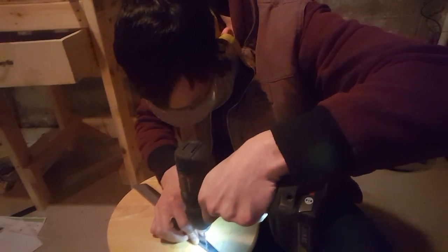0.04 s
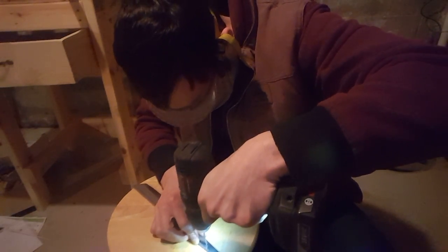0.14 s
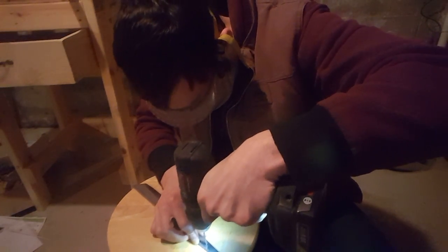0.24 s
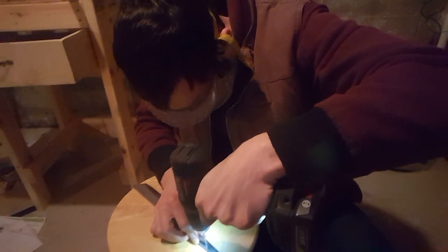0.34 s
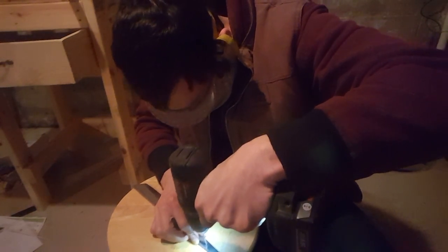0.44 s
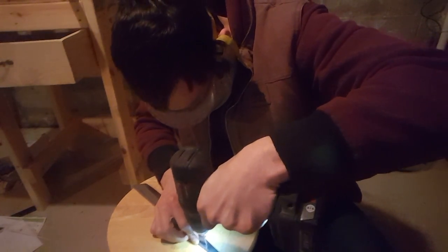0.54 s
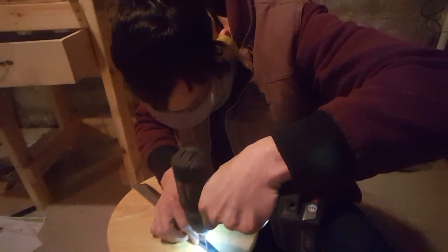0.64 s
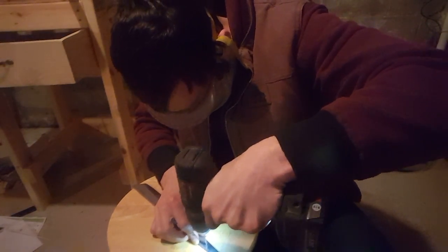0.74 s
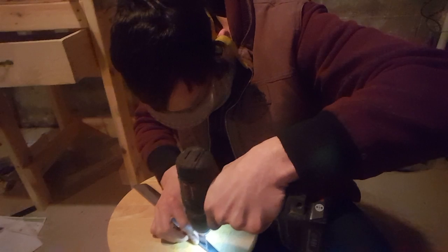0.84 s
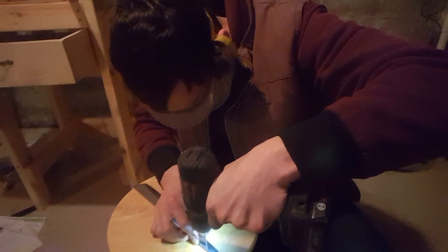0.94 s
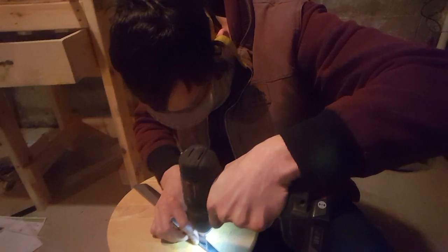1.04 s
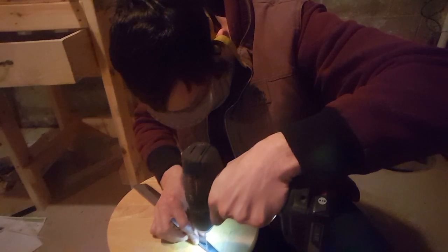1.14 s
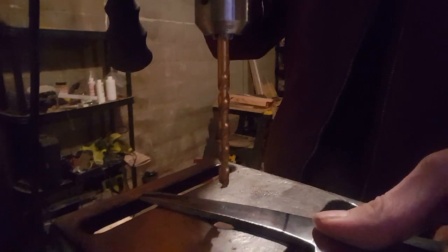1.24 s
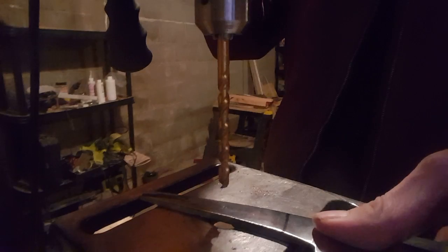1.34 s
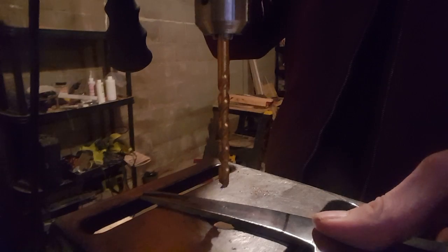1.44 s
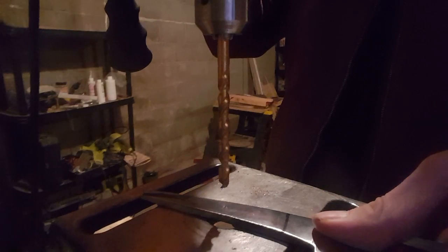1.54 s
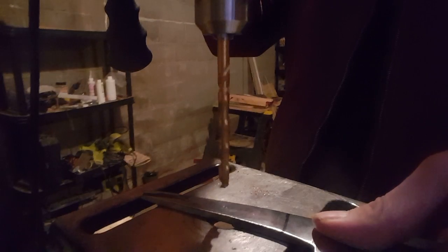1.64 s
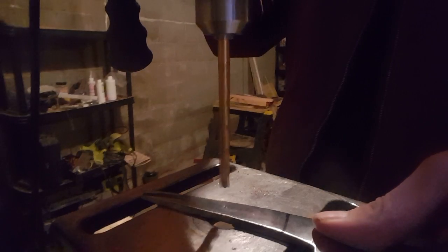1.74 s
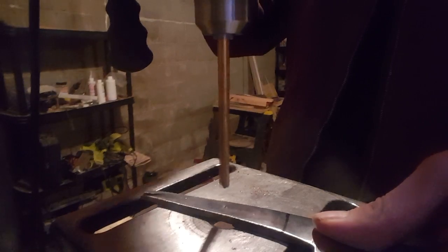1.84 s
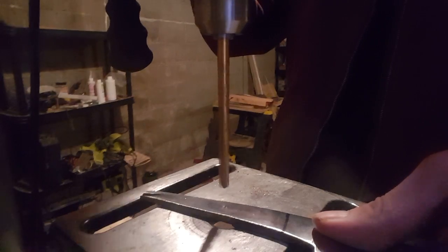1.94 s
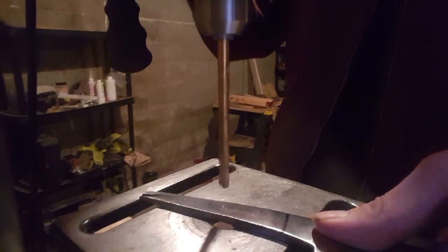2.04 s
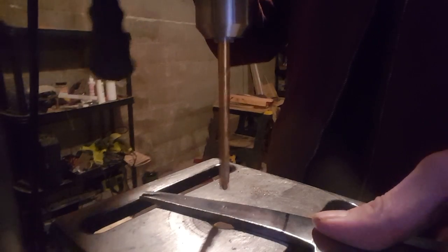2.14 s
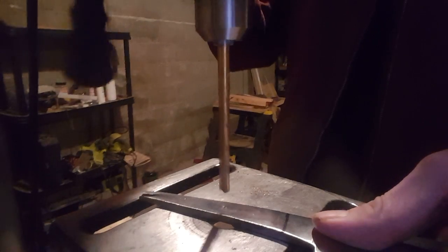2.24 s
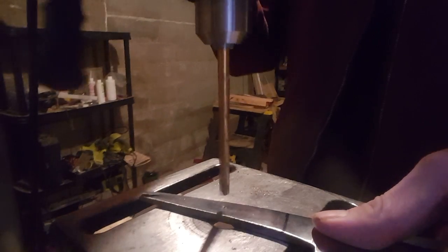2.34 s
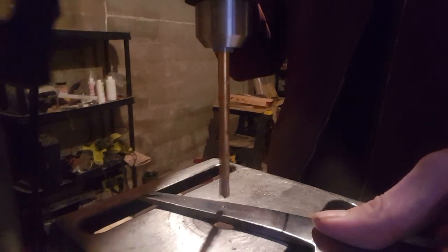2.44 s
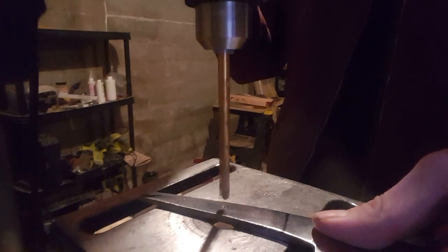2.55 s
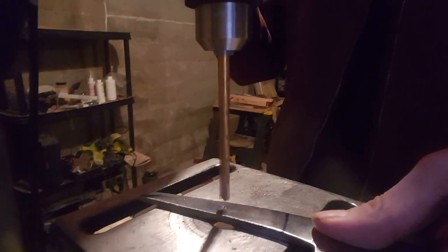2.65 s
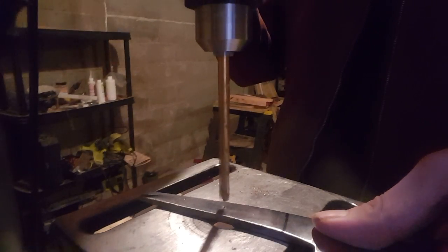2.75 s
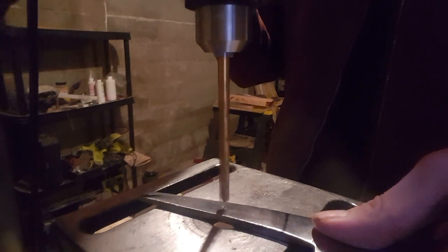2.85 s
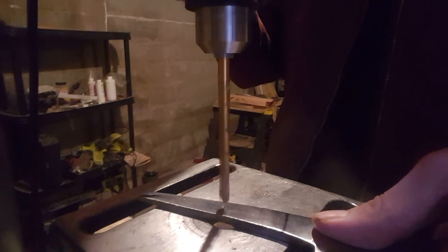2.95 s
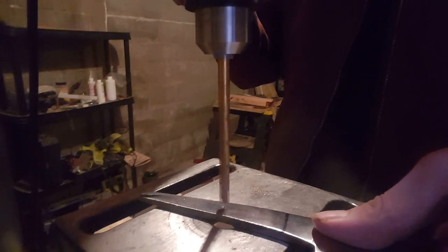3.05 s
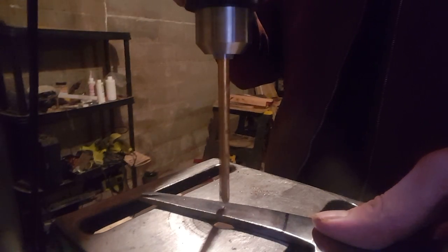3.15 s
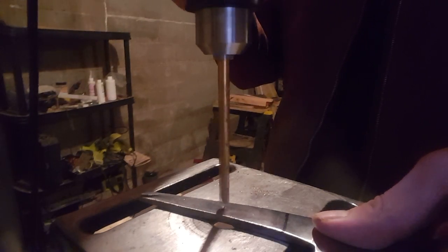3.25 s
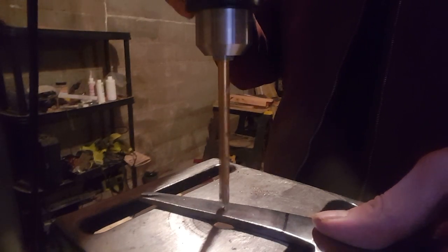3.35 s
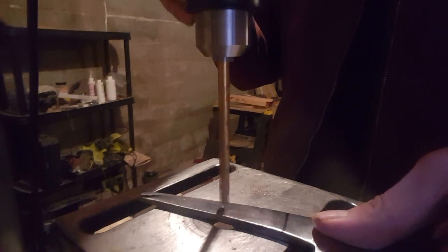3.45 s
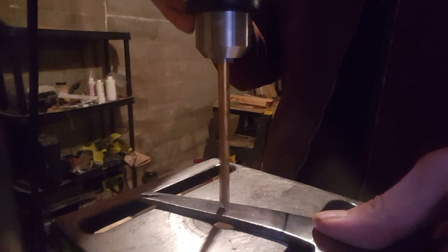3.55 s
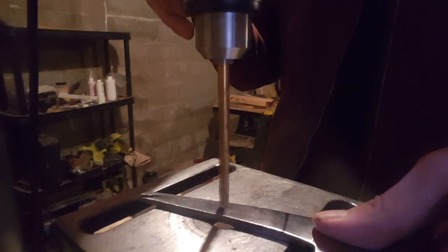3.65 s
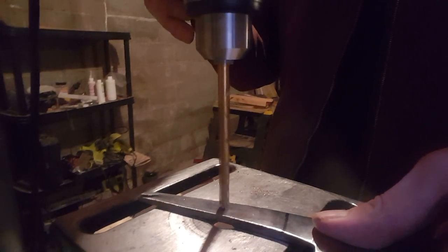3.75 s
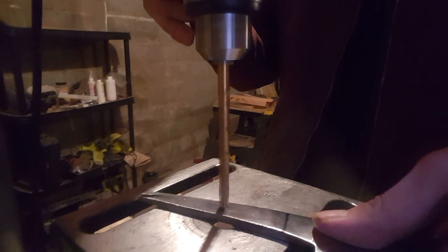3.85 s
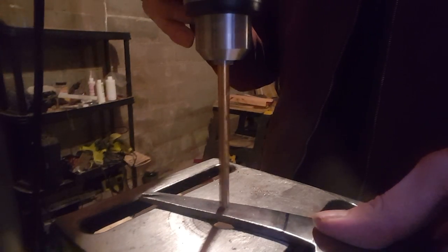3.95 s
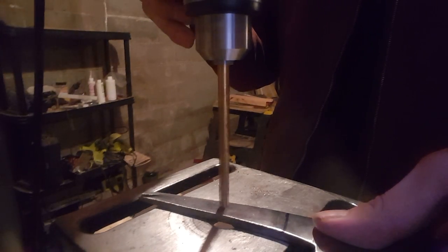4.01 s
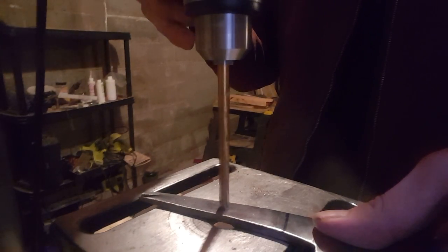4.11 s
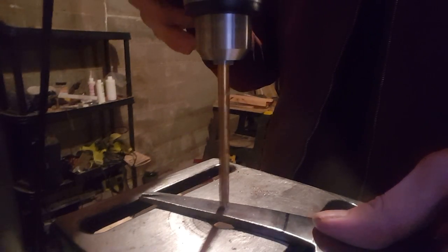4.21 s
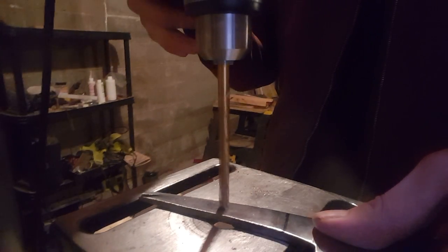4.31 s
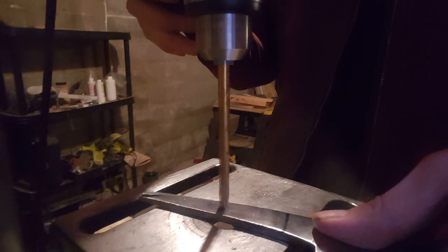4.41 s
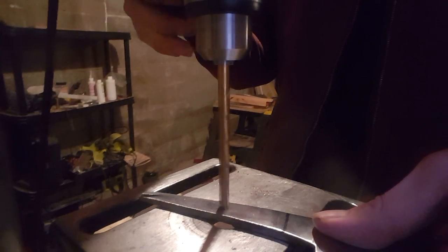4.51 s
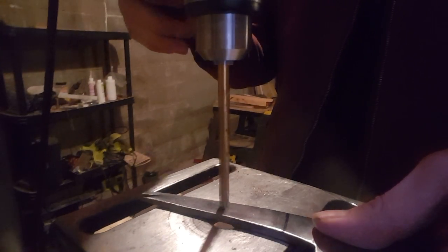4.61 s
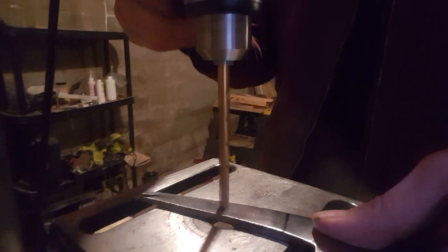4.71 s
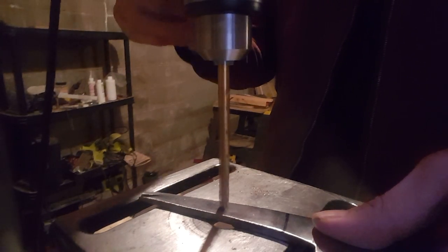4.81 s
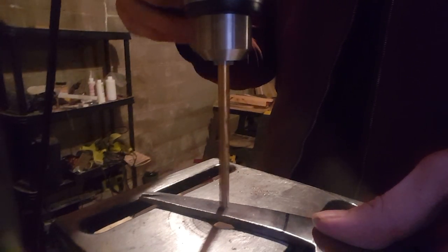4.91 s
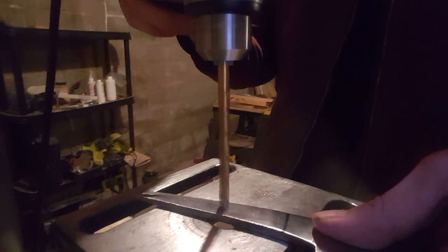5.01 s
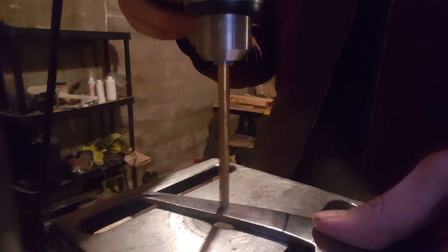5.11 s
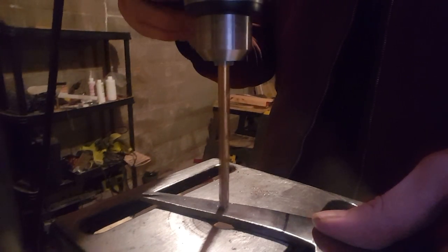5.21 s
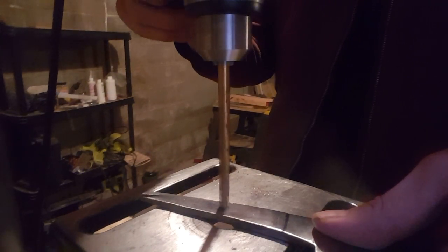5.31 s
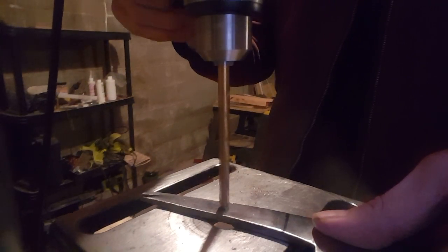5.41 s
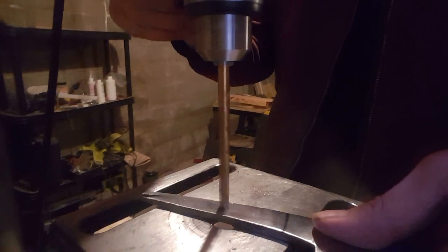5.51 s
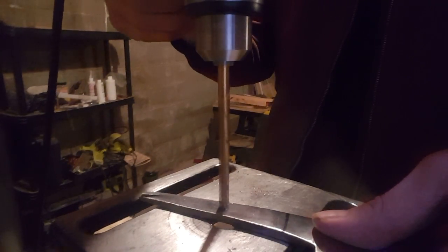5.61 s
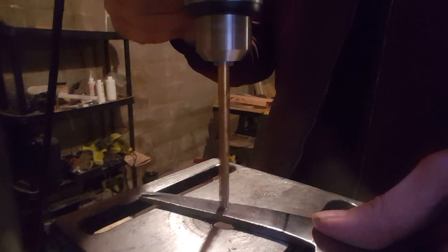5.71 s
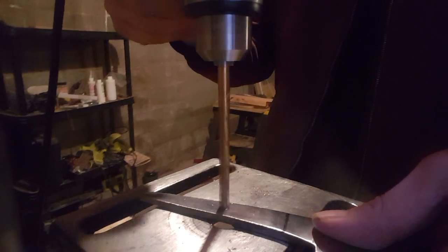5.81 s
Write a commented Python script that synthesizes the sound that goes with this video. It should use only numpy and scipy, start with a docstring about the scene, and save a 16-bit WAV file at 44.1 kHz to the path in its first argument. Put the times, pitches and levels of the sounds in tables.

```python
"""A cordless drill whines close to the microphones and is cut off at 1.3 s: motor orders, gear tones, whirr.
In the quiet workshop a switch is touched, then thrown with a snap of noise, ringing latch and housing.
A drill press groans up to speed and hums at multiples of the mains; its loose quill rattles in bursts
of noise, the belt slaps, and the feed lever knocks. From 4 s the bit lands on a steel blade, chatters
in uneven grabs and cuts in fine grains. A small pair of microphones hears it all, with the walls answering."""
import sys
import numpy as np
from scipy import signal
from scipy.fft import rfft, irfft, next_fast_len
from scipy.io import wavfile
from scipy.ndimage import map_coordinates

SR = 44100
rng = np.random.default_rng(int(sys.argv[2]) if len(sys.argv) > 2 else 0)


def transcribe(u):
    """Save the signal u as a 16-bit wav file named by the first command-line argument.

    u: samples, shape (n,) or (channels, n), limited to [-1, 1]; the rate is SR.
    q: integer samples, one column per channel.
    """
    v = np.clip(np.atleast_2d(u).T, -1, 1)
    q = np.round(v * 32767).astype(np.int16)
    wavfile.write(sys.argv[1], SR, q)


N = 258867

# modes of the press casting: (frequency [Hz], width [Hz], level [dB])
CASTING = [(118, 28, -3.5), (258.8, 27, 7.5), (491, 32, 6), (582.6, 39, 7.5), (1180, 57, -22)]
# modes of the loose quill: (frequency [Hz], width [Hz], level [dB])
QUILL = [(1548, 220, 0), (2164, 156, 5), (2495, 116, 8.5), (2735, 194, 3), (3190, 210, 1),
         (3700, 1200, -13.5)]
# modes of the chuck: (frequency [Hz], width [Hz], level [dB])
CHUCK = [(5200, 1200, 3.5), (6500, 610, 2.5), (8200, 1750, 3.5), (9600, 2600, -5.5)]
# modes of the chuck jaws: (frequency [Hz], width [Hz], level [dB])
JAWS = [(11500, 1200, 0), (13300, 1500, 0)]
# the quill knocks in the head and the chuck ticks with it:
# (time [s], quill peak [dB], chuck rms [dB], jaws rms [dB])
RATTLE = [(1.7144, -27, -44, -66), (1.7443, -27, -51, -63), (1.7876, -36, -66, -73), (1.806, -43, -67, -72),
          (1.871, -31, -60, -72), (1.9107, -29, -52, -64), (1.9892, -19.5, -47.5, -68),
          (2.008, -27, -52, -69), (2.072, -23.5, -51.5, -65), (2.114, -22.5, -45.5, -64),
          (2.134, -24, -49, -60), (2.153, -33, -56, -66), (2.1917, -18.5, -47, -59),
          (2.21, -14.5, -40, -61), (2.221, -19, -44, -62), (2.238, -12.5, -38.5, -57),
          (2.248, -19.5, -49, -62), (2.355, -39, -66, -69), (2.372, -32, -51, -66),
          (2.396, -22.5, -54, -67), (2.416, -34, -57, -67), (2.436, -20.5, -48, -65),
          (2.4545, -28, -46, -63), (2.52, -19.5, -50, -65), (2.536, -36, -46, -60), (2.56, -25, -44.5, -64),
          (2.6004, -19.5, -45, -63), (2.618, -23, -39, -54), (2.6815, -27, -62, -68),
          (2.6975, -25.5, -45.5, -59), (2.7357, -30, -53, -70), (2.7593, -24.5, -55, -66),
          (2.778, -23.5, -45.5, -62), (2.801, -30, -64, -69), (2.819, -24.5, -57, -71),
          (2.843, -31, -59, -68), (2.863, -17.5, -36, -46), (2.92, -27, -60, -68), (2.9376, -28, -52, -69),
          (2.9615, -20.5, -46, -70), (3.0065, -17.5, -47, -65), (3.018, -25, -41.5, -59),
          (3.0856, -16, -39.5, -59), (3.1226, -24.5, -51, -69), (3.163, -24.5, -51, -70),
          (3.183, -27, -52, -71), (3.222, -37, -68, -70), (3.247, -18.5, -44, -68), (3.266, -30, -45, -66),
          (3.281, -26, -51, -66), (3.306, -26, -48, -67), (3.328, -20, -51, -71), (3.4105, -20, -44, -69),
          (3.425, -23, -44, -65), (3.446, -20.5, -48, -67), (3.4854, -24, -60, -69), (3.502, -25, -50, -66),
          (3.528, -41, -65, -73), (3.5505, -45, -67, -70), (3.574, -22, -46, -64),
          (3.5928, -20, -38.5, -52), (3.6286, -26.5, -49, -66), (3.6873, -27, -57, -71),
          (3.7367, -25, -42, -62), (3.754, -20, -34.5, -43), (3.8167, -22, -50, -67), (3.86, -32, -59, -68),
          (3.8687, -31, -57, -69), (3.896, -30, -62, -68), (3.91, -31, -48, -67), (3.9602, -23, -42, -48),
          (4.0043, -21, -33.5, -40), (4.043, -37, -45, -54.5), (4.0843, -24.5, -40, -53),
          (4.124, -30, -52, -61), (4.138, -24, -41, -56), (4.165, -23, -35, -45), (4.2034, -44, -57, -64),
          (4.217, -27, -53, -58), (4.2493, -21, -40, -50), (4.287, -39, -56, -66), (4.3007, -20, -43, -55),
          (4.3284, -30, -43, -50), (4.363, -20, -36, -49), (4.3689, -19, -33.5, -47),
          (4.38, -16.5, -40, -51), (4.413, -24, -45, -57)]
# the tip skips on the blade and rings it: (time [s], peak [dB])
LANDINGS = [(3.961, -31), (4.0032, -22.5), (4.0841, -29), (4.1659, -31), (4.247, -25), (4.3685, -42)]
# the switch is touched, then thrown, and its housing is knocked as the feed lever moves:
# (time [s], snap [dB], housing ring [dB], treble [dB], casting knock [dB],
#  extra strength of the middle housing mode [dB], latch ring [dB], aftersound [dB])
SWITCH = [(1.394, -25, -32.5, -42, -32, -3, -41, -43.5), (1.4525, -52, -46.5, -51, -44, -7, -66, -55),
          (1.497, -57, -56, -66, -60, 3, -70, -64), (1.6727, -38, -44, -51, -40, 0, -56, -33),
          (1.687, -6.5, -7, -14, 11, 7.5, -35, -27), (2.153, -34, -23, -55, 4, 7, -60, -59),
          (2.199, -23, -26, -40, 12, -11, -38, -40), (2.211, -12, -11.5, -35, 13, -1, -23, -25.5)]
QUILL_T60 = 0.02  # s


def amp(db):
    """Amplitude factor of a level in dB."""
    return 10 ** (np.asarray(db) / 20)


def unit(x):
    """x brought to rms 1."""
    return x / np.sqrt(np.mean(x ** 2) + 1e-20)


def along(points, hz):
    """(Hz, value) points on a log axis."""
    f, v = np.transpose(points)
    return np.interp(np.log(hz + 1), np.log(f + 1), v)


def curves(rows):
    """One value per sample for each column after the time."""
    s, *cols = np.transpose(rows)
    return [np.interp(np.arange(N) / SR, s, c) for c in cols]


def wobble(rate):
    """Random knots, rate of them a second, joined by straight lines."""
    knots = rng.standard_normal(int(N * rate / SR) + 4)
    return map_coordinates(knots, [np.arange(N) * rate / SR], order=1)


def filtered(x, response):
    """x times a complex response of frequency."""
    m = next_fast_len(N + SR // 2)
    return irfft(rfft(x, m) * response(np.fft.rfftfreq(m, 1 / SR)), m)[..., :N]


def noise(spectrum):
    """Noise of rms 1 with a colour."""
    return unit(filtered(rng.standard_normal(N), lambda hz: amp(along(spectrum, hz))))


def resonances(modes):
    """Causal response of (Hz, width, dB) modes, with alternating signs."""
    def response(f):
        return sum((-1) ** k * amp(db) * 1j * f * w / (c * c - f * f + 1j * f * w)
                   for k, (c, w, db) in enumerate(modes))
    return response


def ring(modes, scatter_db, attack):
    """One blow on an object, 0.2 s long: each (Hz, dB, t60) mode at a new strength, peak 1."""
    t = np.arange(SR // 5) / SR
    x = sum(amp(db + scatter_db * rng.normal() - 60 * t / t60) * np.sin(2 * np.pi * hz * t)
            for hz, db, t60 in modes)
    x = x * (1 - np.exp(-t / attack))
    return x / np.abs(x).max()


def crack(modes, t60, scatter_db, top_hz):
    """A loose contact: a click and a dying burst of noise through broad modes at new strengths, peak 1."""
    t = np.arange(SR // 4 if t60 > .06 else SR // 10) / SR
    decay = amp(-60 * t / max(t60, .005)) + 2.5 * amp(-60 * t / 0.00097)
    burst = decay * (1 - np.exp(-t / 0.00018)) * rng.standard_normal(len(t))
    colour = resonances([(c, w, db + scatter_db * rng.normal()) for c, w, db in modes])
    hz = np.fft.rfftfreq(len(t), 1 / SR)
    x = irfft(rfft(burst) * colour(hz) / (1 + (hz / top_hz) ** 8), len(t))
    return x / np.abs(x).max()


def loud(x):
    """A blow brought to rms 1 over its first moment."""
    return x / np.sqrt(np.mean(x[:SR // 60] ** 2))


def add(track, s, sound):
    """Lay a sound into the track at s seconds."""
    track[round(s * SR):][:len(sound)] += sound


def gate(start, rise):
    """0 before start, 1 after the rise."""
    return np.clip((np.arange(N) / SR - start) / rise, 0, 1)


def pan(db):
    """Gains of the two ports, db apart, left over right."""
    return amp([[db / 2], [-db / 2]])


def direct(x, lag):
    """The left port hears it lag samples late, less so in the treble; the body shades each port."""
    # left-right difference: (frequency [Hz], level [dB])
    shadow = [(100, 0), (600, 0), (2000, -3.5), (4500, 1.5), (8000, -0.5), (11500, -5), (15000, -4)]
    skew_rad = 1.1  # each port's phase shift levels off here

    def ports(hz):
        skew = skew_rad * np.tanh(np.pi * hz / SR * lag / skew_rad)
        return amp(along(shadow, hz) * [[.5], [-.5]]) * np.exp(-1j * skew * np.array([[1], [-1]]))
    return filtered(x, ports)


def placed(x, lag, wet_db, t60):
    """Direct sound plus the walls' answer: different at each port, a new random tail every 0.1 s, crossfaded."""
    # share of the walls: (frequency [Hz], level [dB])
    walls = [(100, -0.5), (400, -22.5), (900, 1), (2000, 8.5), (8000, 9), (15000, 8)]
    hop = SR // 10
    t, count = np.arange(hop) / SR, N // hop + 2
    tails = rng.standard_normal((count, 2, hop)) * amp(-60 * t / t60) * (t > .002)
    padded = np.pad(direct(x, lag=0), ((0, 0), (hop, 3 * hop)))
    echo = np.zeros((2, N + 6 * hop))
    window = np.sin(np.pi * np.arange(2 * hop) / (2 * hop))
    for k, tail in enumerate(tails):
        piece = padded[:, k * hop:(k + 2) * hop] * window
        answer = signal.fftconvolve(piece, tail / np.linalg.norm(tail[0]), axes=1)
        echo[:, k * hop:(k + 3) * hop - 1] += answer

    def wet(hz):
        return amp(wet_db + along(walls, hz))
    near = filtered(direct(x, lag), lambda hz: 1 / np.hypot(1, wet(hz)))
    far = filtered(echo[:, hop:hop + N], lambda hz: wet(hz) / np.hypot(1, wet(hz)))
    return near + far


def room_tone():
    """The quiet workshop: steady coloured noise, mostly by way of the walls."""
    # (frequency [Hz], level [dB per Hz])
    room_colour = [(15, -58.5), (25, -25), (53, -48), (91, 1), (113, -16), (241, -5), (276, -16.5),
                   (700, -15.5), (1000, -24.5), (1680, -23), (2090, -26), (3800, -30), (4600, -33.5),
                   (15800, -42.5)]
    return amp(-63) * placed(noise(room_colour), lag=0, wet_db=6.0, t60=0.16)


def faint_whistle():
    """A faint whistle of one pitch in the workshop, its strength trembling at random."""
    tone = np.sin(2 * np.pi * 1707 * np.arange(N) / SR)
    return amp(-73) * wobble(120) * tone * gate(1.48, .05)


def cordless():
    """Motor orders and gear tones over a whirr that throbs with the planet gears."""
    # as the wrist turns it: (time [s], motor orders 1, 9, 12 and 15 [dB, before a lift of 1 dB])
    order_levels = [(.05, -36.5, -36, -46.5, -43), (.42, -39.5, -43, -46.5, -45.5),
                    (.52, -35.5, -37.5, -45, -38.5), (.75, -36.5, -38, -43, -38),
                    (.88, -35.5, -41, -42, -40), (1, -37.5, -47, -42, -42), (1.15, -36, -42, -42.5, -39),
                    (1.3, -39.5, -42.5, -39.5, -40)]
    strong_orders = (1, 9, 12, 15)  # multiples of the motor turns
    # weaker motor orders and gear tones: (multiple of the motor turns, level [dB], unsteadiness [Hz])
    gears = [(.669, -46, 5), (1.4, -48, 15), (1.845, -46, 3), (2, -51, 4), (2.17, -49, 12), (3, -46, 2),
             (4, -46, 20), (5.02, -49, 10), (6.86, -48, 20), (9.25, -45.5, 10), (10.24, -47, 6),
             (19.84, -44, 12), (20.51, -47, 12), (21, -44, 3), (24, -51, 8), (27, -54, 8), (31, -54, 8),
             (33, -57, 8), (36, -49, 4), (39, -51, 4), (43, -55, 8)]
    # (time [s], motor turns [Hz])
    speed = [(0, 349.8), (.44, 350.2), (.51, 348.9), (.75, 348.7), (.96, 351.3), (1.3, 352.2)]
    # (frequency [Hz], level [dB per Hz])
    whirr_colour = [(35, -70), (60, -48.5), (216, -14), (293, -20), (345, -12.5), (416, -23), (633, -17.5),
                    (963, -20.5), (1060, -15.5), (1850, -14.5), (2700, -13.5), (3500, -15.5), (4490, -21),
                    (5600, -20), (7000, -15), (9030, -16), (13000, -27), (15800, -21.5)]
    cut_s, planet, whirr_db = 1.2975, .669, -26.5  # planet: multiple of the motor turns

    n = round(cut_s * SR)
    turns_hz, *strong_db = (c[:n] for c in curves(speed) + curves(order_levels))
    phase = 2 * np.pi * np.cumsum(turns_hz) / SR
    tones = np.zeros(n)
    for k, db in zip(strong_orders, strong_db):
        tones += amp(db + 1 + 1.6 * wobble(25)[:n]) * np.sin(k * phase + 6 * rng.random())
    for k, db, unsteady_hz in gears:
        drift = 2 * np.pi * np.cumsum(unsteady_hz * wobble(30.04)[:n]) / SR
        tones += amp(db + 1.5 * wobble(6)[:n]) * np.sin(k * phase + drift + 6 * rng.random())
    throb = 1 + 0.19 * np.cos(planet * phase) + 0.032 * np.cos(phase)
    whirr = amp(whirr_db + 0.61 * wobble(9.0)[:n]) * throb * noise(whirr_colour)[:n]
    rest = (0, N - n)
    both = placed(np.pad(whirr, rest), lag=4.6, wet_db=-4, t60=.2)
    both += placed(np.pad(np.sqrt(2) * tones, rest), lag=4.6, wet_db=-32, t60=.1)
    return both * pan(0.9) * (np.arange(N) < n)  # the walls' answer is cut off too


def switch():
    """The switch snaps, its latch and housing ring, and the workshop answers."""
    # the spring latch inside: (frequency [Hz], level [dB], t60 [s])
    latch = [(3790, 0, 0.03), (4400, -6, 0.02)]
    # (frequency [Hz], level [dB], t60 [s])
    housing = [(530, -7, 0.055), (830, -5, 0.06), (1140, 2, 0.035)]
    # body of the snap: (frequency [Hz], width [Hz], level [dB])
    snap = [(1220, 230, -3), (2300, 870, 0), (3780, 1700, -24)]
    # treble of the snap: (frequency [Hz], width [Hz], level [dB])
    spark = [(5200, 1800, -7), (7950, 5500, 2), (12400, 6700, -1)]
    # the workshop's answer: (frequency [Hz], width [Hz], level [dB])
    aftersound = [(800, 700, 3.5), (2200, 1500, -3), (3880, 1200, -1.5)]

    x = np.zeros(N + SR)
    for s, snap_db, housing_db, treble_db, _, middle_db, latch_db, after_db in SWITCH:
        struck = np.add(housing, [[0, 0, 0], [0, middle_db, 0], [0, 0, 0]])
        add(x, s, amp(latch_db) * ring(latch, scatter_db=2, attack=.001))
        add(x, s, amp(snap_db) * crack(snap, t60=0.009, scatter_db=1.5, top_hz=7000))
        add(x, s, amp(treble_db) * crack(spark, t60=.022, scatter_db=1.5, top_hz=17000))
        add(x, s + .002, amp(housing_db) * ring(struck, scatter_db=1.5, attack=.005))
        add(x, s + .003, amp(after_db) * crack(aftersound, t60=0.26, scatter_db=1, top_hz=6000))
    return placed(x[:N], lag=2.5, wet_db=-15, t60=0.06)


def motor():
    """The windings tug twice a mains cycle: multiples hum, the casting drones, belt and bearings hiss."""
    # spinning up, idling, then loaded:
    # (time [s], casting drone [dB], belt and bearing hiss [dB], hum of the table [dB])
    press_levels = [(1.72, -6.5, -17.5, -35), (1.79, -27, -38, -57), (1.92, -27.5, -41.5, -27),
                    (2.25, -24, -38.5, -28), (2.6, -24, -42, -29), (3.1, -26.5, -38.5, -25.5),
                    (3.3, -25, -40.5, -34.5), (3.5, -24.5, -41, -30), (3.93, -28, -37.5, -30.5),
                    (4.02, -24.5, -37, -28), (4.25, -23, -34.5, -35.5), (4.55, -24.5, -34, -22.5),
                    (5.1, -25, -36, -21.5), (5.45, -24.5, -38, -24), (5.87, -28.5, -34, -25.5)]
    # (multiple of the tug rate, level over hum_db [dB], left-right [dB])
    hum_multiples = [(1, -5.5, 5.5), (3, -3.5, -0.5), (4, -8, -4), (5, -5.5, -2), (6, 3, -3.5),
                     (7, -8, -12), (9, -25.5, 36)]
    # the starting motor groans roughly: (time [s], frequency [Hz], level [dB])
    spin_up = [(1.72, 561, -45), (1.75, 603, -26), (1.78, 616, -32), (1.815, 638, -26), (1.85, 652, -33),
               (1.9, 690, -66)]
    # (frequency [Hz], level [dB per Hz])
    drone_colour = [(15, -84), (25, -86), (112, -18), (178, -12.5), (243, -1.5), (308, -7.5), (654, -9),
                    (716, -6), (926, -15), (2000, -26.5), (2600, -28), (4400, -54), (9000, -120)]
    # (frequency [Hz], level [dB per Hz])
    hiss_colour = [(590, -39), (1000, -1), (1100, 9), (1250, -1.5), (1950, -5), (2550, -5), (3200, -19),
                   (4050, -19.5), (7210, -27.5), (8380, -28), (15800, -42)]
    tug_hz, hum_db = 120, -35
    step_rad = .4  # how far the multiples stand out of step
    surge_hz, surge_s, surge_depth_db, settle_s = 10.7, 1.815, 6, 0.15  # the slack belt surges, then settles

    drone_db, hiss_db, table_db = curves(press_levels)
    since = np.clip(np.arange(N) / SR - surge_s, -.04, None)
    surge_db = surge_depth_db * np.exp(-since / settle_s) * np.cos(2 * np.pi * surge_hz * since)
    phase = 2 * np.pi * tug_hz * np.arange(N) / SR
    hum = amp(table_db + 2.1 * wobble(20)) * np.cos(2 * phase) * pan(.8)
    for k, db, pan_db in hum_multiples:  # nearly in step: one magnetic tug each half mains cycle
        level = amp(hum_db + db + 1.2 * wobble(20))
        hum = hum + level * np.cos(k * phase + step_rad * rng.normal()) * pan(pan_db)
    groan_hz, groan_db = curves(spin_up)
    groan = (1 + 0.8 * wobble(70)) * np.sin(2 * np.pi * np.cumsum(groan_hz) / SR)
    hum = hum + amp(groan_db) * (1 - gate(2.7, .05)) * groan
    # the pull of the windings also shakes the casting in bursts, twice a mains cycle
    shake = noise(drone_colour) * (1 + 0.38 * np.cos(phase)) * amp(1.5 * wobble(40))
    drone = unit(shake + 1.24 * filtered(shake, resonances(CASTING)))
    drone = amp(drone_db + surge_db + 0.19 * wobble(15)) * drone
    hiss = noise(hiss_colour) * (1 + 0.5 * np.cos(phase))
    hiss = amp(hiss_db + .4 * surge_db + 2 * wobble(50) + 2.5 * wobble(200)) * hiss
    both = np.sqrt(2) * hum
    both = both + placed(drone, lag=15.5, wet_db=-3.0, t60=0.16)
    both = both + placed(hiss, lag=11.4, wet_db=-4.0, t60=0.054)
    return gate(1.69, 0.18) * both


def jingle(press):
    """Between the clear ticks chuck and quill tick faintly, at near-regular moments and chance strengths."""
    chances_hz, one_s, faintest_db = 49.3, 1.9887, -47.5  # chances a second, one such moment
    for k, (late, size) in enumerate(rng.random((130, 2))):
        tick = crack(QUILL[2:] + CHUCK + JAWS, t60=.01, scatter_db=8, top_hz=17000)
        tick = tick + amp(3.5) * crack(QUILL, QUILL_T60, scatter_db=9, top_hz=4600)
        strength = amp(faintest_db - 4 * np.log(1 - .93 * size))
        add(press, one_s + (k - 6 + .2 * (late - .5)) / chances_hz, strength * tick)


def rattle(press):
    """The loose quill knocks in the head; chuck and jaws tick with it in shorter, brighter bursts."""
    for s, quill_db, chuck_db, jaws_db in RATTLE:
        add(press, s, amp(quill_db) * crack(QUILL, QUILL_T60, scatter_db=4, top_hz=5000))
        add(press, s, amp(chuck_db) * loud(crack(CHUCK, t60=0.017, scatter_db=2.0, top_hz=9400)))
        add(press, s, amp(jaws_db) * loud(crack(JAWS, t60=0.008, scatter_db=3, top_hz=17000)))


def belt_and_table(press):
    """The slack belt slaps the ringing pulley cover, and the jolted table booms at one low mode."""
    # slaps of the belt, most as it takes up speed, two later: (time [s], peak [dB])
    slaps = [(1.806, -23), (1.893, -16), (1.912, -22), (1.976, -15.5), (2.014, -23.5), (2.078, -20),
             (2.152, -18.5), (2.2, -12), (2.774, -15), (4.283, -15.5)]
    # pulley cover: (frequency [Hz], level [dB], t60 [s])
    cover = [(252, -11, 0.071), (498.6, 1.5, 0.059), (613, -8, 0.047)]
    # jolts of the table: (time [s], peak [dB])
    jolts = [(2.212, -16.5), (4.009, -8.5), (4.14, -14), (4.252, -14), (4.41, -12)]
    # table: (frequency [Hz], level [dB], t60 [s])
    boom = [(240.6, 0, 0.07)]
    for s, db in slaps:
        add(press, s, amp(db) * ring(cover, scatter_db=2, attack=.004))
    for s, db in jolts:
        add(press, s, amp(db) * ring(boom, scatter_db=0, attack=.01))


def key_and_blade(press):
    """A loose steel key sings at one pitch after the knock; the landing tip rings two blade modes."""
    # time [s], frequency [Hz], peak [dB], t60 [s]
    key_s, key_hz, key_db, key_t60 = (2.255, 4862, -56, .3)
    # (frequency [Hz], level [dB], t60 [s])
    blade = [(3540, 10, 0.028), (8380, 10, 0.032)]
    add(press, key_s, amp(key_db) * ring([(key_hz, 0, key_t60)], scatter_db=0, attack=.01))
    for s, db in LANDINGS:
        add(press, s, amp(db) * ring(blade, scatter_db=3, attack=.001))


def casting_knocks():
    """Quill, landing tip and switch each give the casting an impulse, softened above 1500 Hz."""
    knock_db, thud_db = 4, 28  # over the quill's knock, and over the ring of a landing tip
    knocks = np.zeros(N)
    for s, quill_db, *_ in RATTLE:
        knocks[round(s * SR)] += amp(quill_db + knock_db)
    for s, db in LANDINGS:
        knocks[round(s * SR)] += amp(db + thud_db)
    for s, _, _, _, casting_db, *_ in SWITCH:
        knocks[round(s * SR)] += amp(casting_db)
    return filtered(knocks, lambda hz: resonances(CASTING)(hz) / (1 + (hz / 1500) ** 4))


def blows():
    """All the blows on the press, heard from one place."""
    press = np.zeros(N + SR)
    for strike in (jingle, rattle, belt_and_table, key_and_blade):
        strike(press)
    return placed(press[:N] + casting_knocks(), lag=5.33, wet_db=-15, t60=0.06)


def table_chatter():
    """The edges grab at an uneven rate and shake the table's modes; the lowest mode only shudders."""
    # (frequency [Hz], width [Hz], level [dB])
    table = [(220, 19, 0), (269.4, 5.2, 1.5), (331, 32, -13), (380.2, 21, -9), (450, 160, -15.5),
             (1201, 47, -17)]
    grab_hz, stiff_hz = 53.7, 180  # mean grabs a second; the table hardly moves below stiff_hz
    count = np.cumsum(grab_hz * (1 + .012 * wobble(9))) / SR
    grabs = np.diff(np.floor(count), prepend=0) * amp(2.7 * wobble(45))
    shaken = filtered(unit(grabs) + 0.8 * rng.standard_normal(N), resonances(table[1:]))
    shudder = filtered(rng.standard_normal(N), resonances(table[:1]))
    chatter = unit(shaken) + unit(shudder)
    return unit(filtered(
        chatter, lambda hz: 1 / (1 + (hz / 1800) ** 4) / (1 + (stiff_hz / (hz + 1)) ** 10)))


def bit():
    """The bit chatters on the steel, chips scrape in fine grains, the shank rubs and a chip squeals."""
    # (time [s], chatter [dB], cutting edge [dB], shank rubbing [dB])
    bit_levels = [(3.94, -53, -57, -58), (4.01, -19, -63, -50), (4.12, -28.5, -59, -51),
                  (4.3, -24, -61, -43), (4.5, -21, -54, -44.5), (4.7, -20, -43.5, -42.5),
                  (5.02, -18, -41.5, -44), (5.27, -21.5, -39, -44), (5.47, -20, -42.5, -47),
                  (5.87, -18.5, -39, -46)]
    # a burr catches: (time [s], gain of the cutting [dB], width [s])
    catches = [(4.72, 5, .008), (4.81, 3, .008), (4.94, 5, 0.008), (5.031, 4, .008), (5.11, 1, 0.007),
               (5.595, 6, 0.0068), (5.667, 9.5, 0.01), (5.743, 10.5, 0.01), (5.827, 11.5, 0.0088)]
    # bit and blade under the cut: (frequency [Hz], width [Hz], level [dB])
    flutes = [(5940, 490, -8.5), (6960, 145, 4), (7180, 170, 2.5), (7360, 120, 1), (7700, 95, -5.5),
              (8130, 73, -5.5), (8590, 190, -7), (9400, 71, -23)]
    # (frequency [Hz], width [Hz], level [dB])
    shank = [(3520, 150, -1), (4000, 220, -1), (4610, 210, 0), (5100, 700, -3.5)]
    # a chip resonance climbs as the hole deepens: (time [s], frequency [Hz], level [dB])
    chip_squeal = [(4.5, 5400, -66), (4.75, 5620, -57), (5.1, 5950, -57), (5.25, 6270, -50),
                   (5.87, 6320, -53)]

    def cut_colour(hz):
        treble = 0.27 + 1 / (1 + (hz / 9200) ** 8)
        return (resonances(flutes)(hz) + 0.06) * treble / (1 + (5200 / (hz + 1)) ** 6)

    def rub_colour(hz):
        return (resonances(shank)(hz) + 0.12) / (1 + (hz / 5600) ** 6) / (1 + (2800 / (hz + 1)) ** 6)

    chatter_db, cut_db, shank_db = curves(bit_levels)
    chatter = amp(chatter_db + 1.5 * wobble(15)) * table_chatter()
    catch_db = sum(db * np.exp(-((np.arange(N) / SR - s) / width) ** 2) for s, db, width in catches)
    grains = rng.standard_normal(N) * amp(3 * wobble(350) + .8 * wobble(70))
    cut = amp(cut_db + catch_db) * unit(filtered(grains, cut_colour))
    rub = amp(shank_db + 0.76 * catch_db) * unit(filtered(grains, rub_colour))
    squeal_hz, squeal_db = curves(chip_squeal)
    squeal = unit(wobble(420) * np.sin(2 * np.pi * np.cumsum(squeal_hz) / SR))
    squeal = amp(squeal_db + catch_db / 2) * squeal
    both = placed(chatter, lag=5.1, wet_db=-17, t60=0.51)
    both += placed(cut + rub + squeal, lag=-4.5, wet_db=-7, t60=.07)
    return gate(3.96, 0.084) * both


def scene():
    """Workshop, cordless drill, then the press and its bit."""
    return room_tone() + faint_whistle() + cordless() + switch() + motor() + blows() + bit()


def record(dry):
    """The microphones lose the deep bass; nothing is kept above the band limit."""
    top_hz, edge_hz = 16000, 250  # band limit and the slope just below it

    def response(hz):
        return np.clip((top_hz - hz) / edge_hz, 0, 1) ** 2 / np.sqrt(1 + (45 / (hz + 1)) ** 4)
    return filtered(dry, response)


dry = scene()
out = record(dry)
transcribe(out)
```